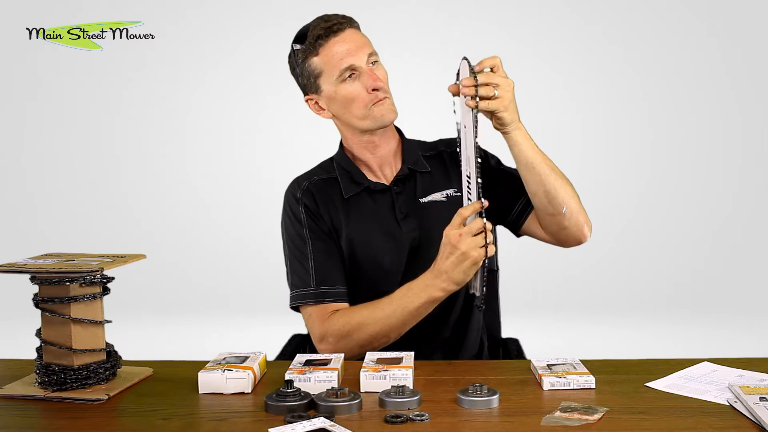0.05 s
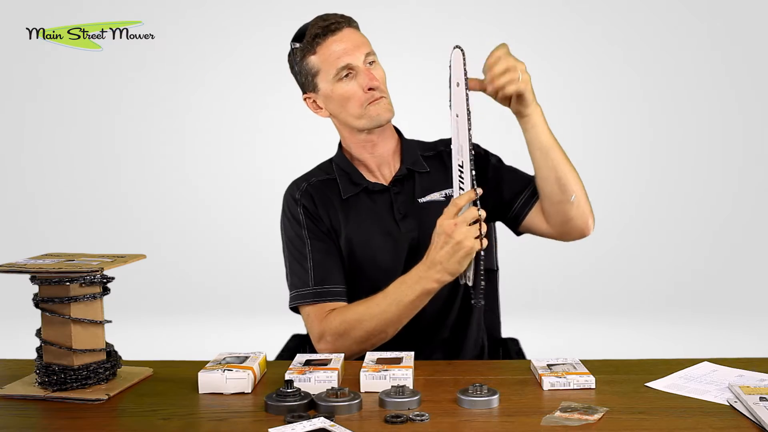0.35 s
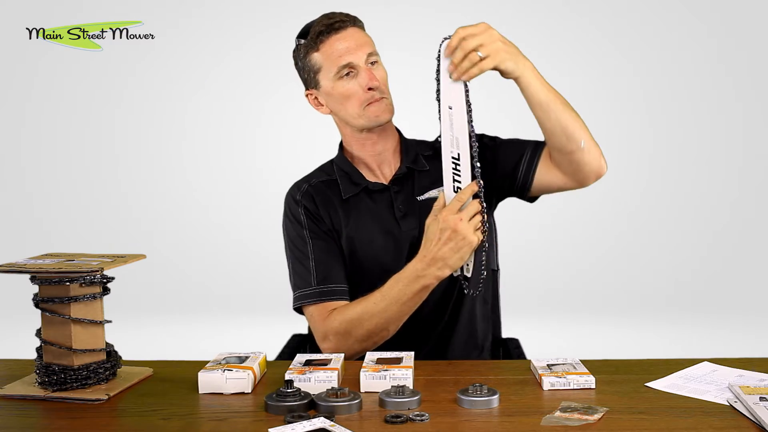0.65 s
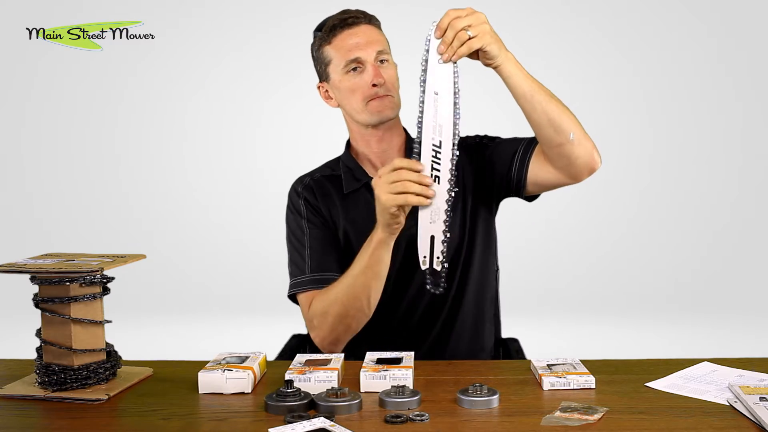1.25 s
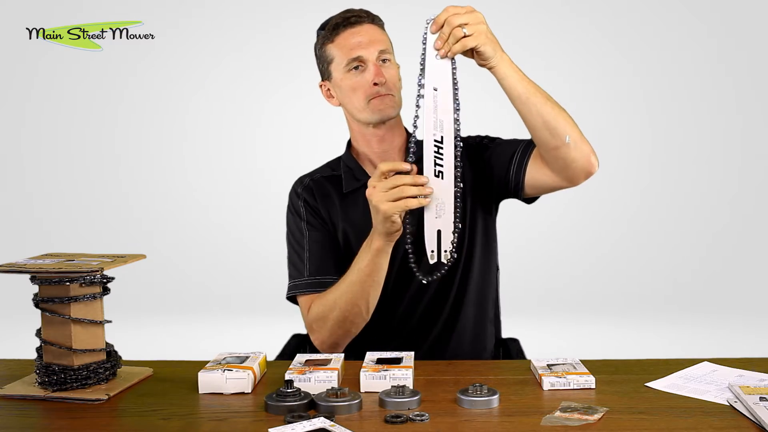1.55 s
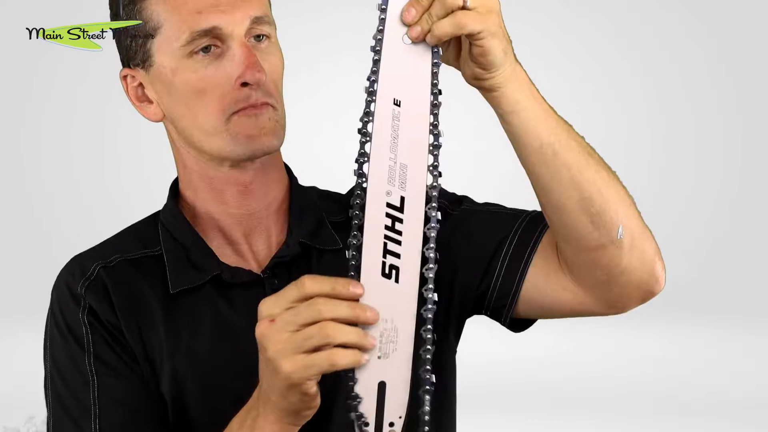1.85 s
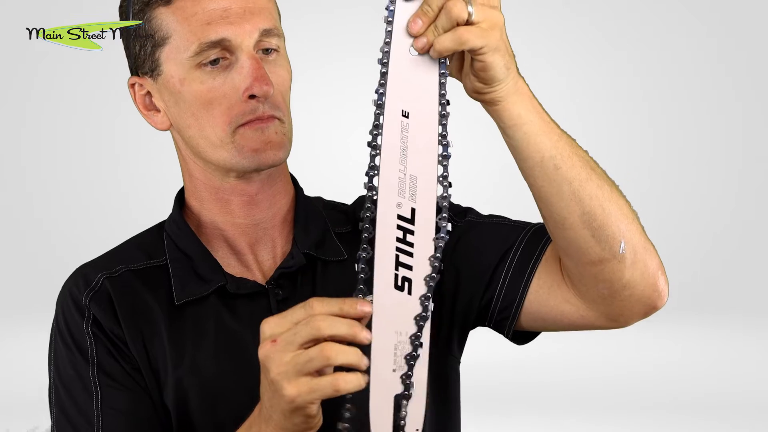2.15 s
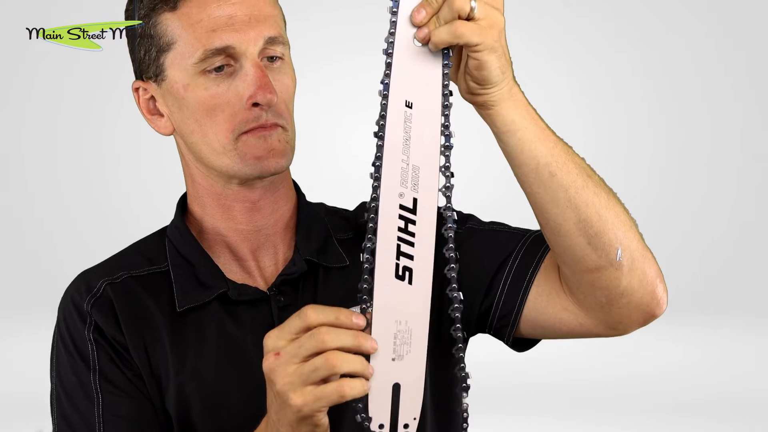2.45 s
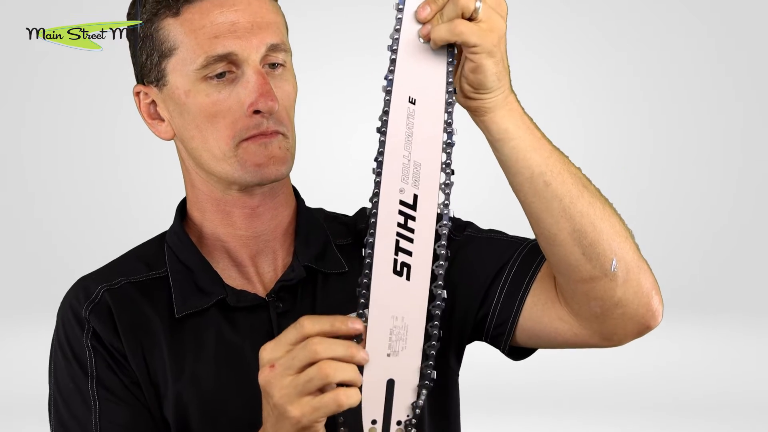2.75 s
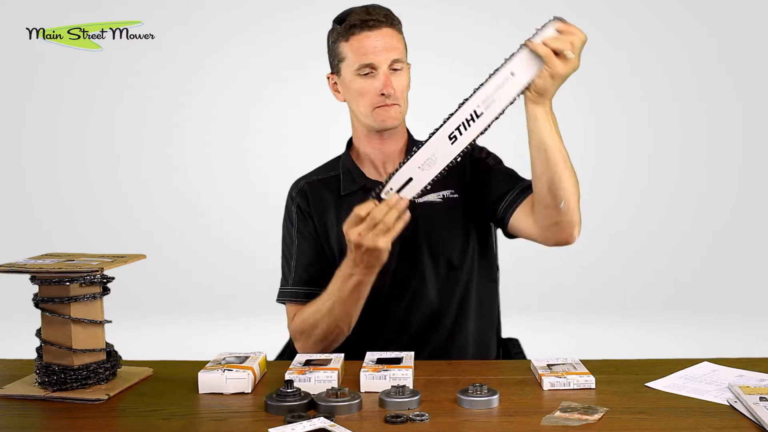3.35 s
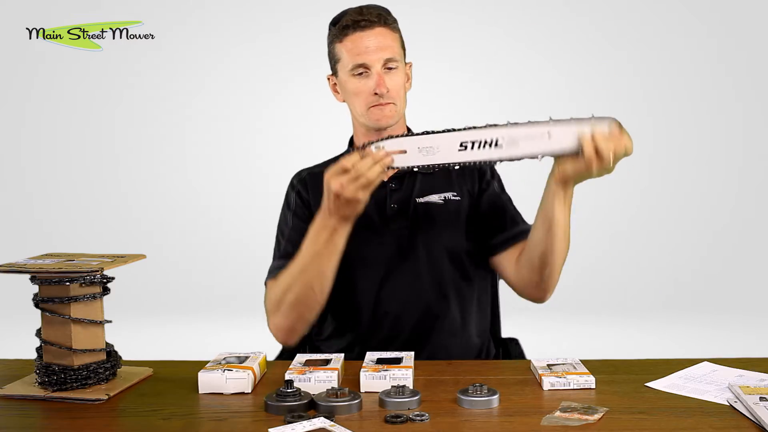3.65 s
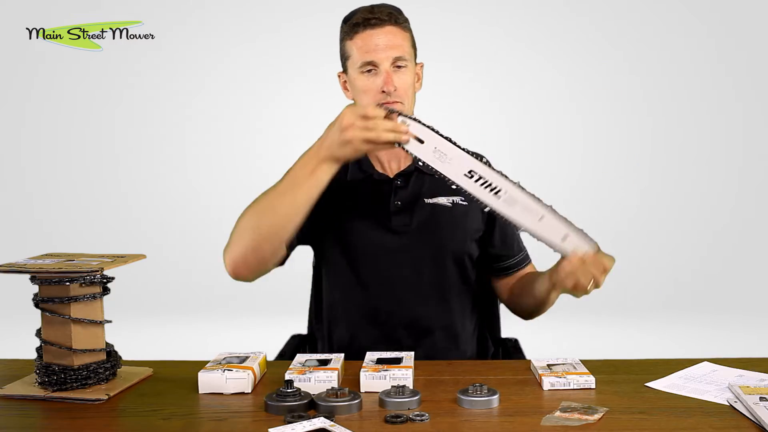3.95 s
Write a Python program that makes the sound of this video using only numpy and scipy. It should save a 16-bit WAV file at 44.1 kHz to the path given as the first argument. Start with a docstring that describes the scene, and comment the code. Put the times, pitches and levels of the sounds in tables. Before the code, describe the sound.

A loose saw chain clicks and rattles in short, irregular bursts as it is fitted round a steel guide bar. Past the middle, one small ping rings on briefly. A faint motor hum lies beneath in the quiet room.

```python
"""A loose saw chain clicks and rattles as it is fitted round a hand-held steel guide bar in a quiet room.
Links strike the bar and slip along it in short bursts, ringing modes that change with the grip;
one small steel part pings and rings on. The chain rubs softly at first, then scrapes and squeaks
as the bar is turned, with a low rustle of the arms. A faint motor drone and room noise lie underneath."""
import sys
import numpy as np
from scipy import signal
from scipy.fft import rfft, irfft
from scipy.io import wavfile

SR = 44100
rng = np.random.default_rng(int(sys.argv[2]) if len(sys.argv) > 2 else 0)


def generate_wav(signal):
    """Clip the signal to [-1, 1] and save it as 16-bit WAV at the path in sys.argv[1]."""
    frames = np.transpose(np.atleast_2d(signal))
    scaled = np.clip(frames, -1, 1) * 32767
    pcm = np.round(scaled).astype(np.int16)
    wavfile.write(sys.argv[1], SR, pcm)


N = 176400

# The three registers of a link contact: low knock, mid clack, bright edge.
# Each row: low and high limit in Hz, then a click's trim in dB and its t60 in seconds.
REGISTERS = [(1263, 2410, 1, 0.021), (3050, 8170, -5.5, 0.034), (7800, 14550, -1, 0.012)]
# Modes of bar and chain. Each row: frequency in Hz, then relative level in dB for each of four grips:
# pinched, feeding the chain on, pulling it round, letting it hang.
BAR_MODES = [(1915, -7.5, -2.5, -31, -33), (3456, -4.5, -38, -21, -11), (4150, -40, -6, -35, -29),
             (4630, -25, -3, -7, -6), (5270, -7.5, -4.5, 0, 2), (5740, 0.5, -3, -0.5, -5),
             (8430, -15, -10, -17, -30)]
GRIP_CHANGES_S = [.5, 1.15, 2.0]


def undb(db):
    """Decibels to gain."""
    return 10 ** (np.asarray(db) / 20)


def unit(x):
    """Scale to rms 1."""
    return x / np.sqrt(np.mean(x ** 2) + 1e-20)


def curve(table, column=1):
    """One column of a timed table, at every sample."""
    rows = np.array(table)
    return np.interp(np.arange(N) / SR, rows[:, 0], rows[:, column])


def fade(t, t60):
    """Full level until t = 0, then an exponential decay."""
    return np.exp(-np.log(1000) * np.maximum(t, 0) / t60)


def band(x, lo, hi, order=2):
    """Causal band-pass."""
    return signal.sosfilt(signal.butter(order, [lo, min(hi, SR * .45)], "band", fs=SR, output="sos"), x)


def band_noise(lo, hi):
    """Noise between two frequencies, at rms 1."""
    return unit(band(rng.standard_normal(N), lo, hi))


def coloured(points):
    """Noise at rms 1, its spectrum shaped by (Hz, dB) points."""
    hz, db = np.array(points).T
    freqs = np.maximum(np.fft.rfftfreq(N, 1 / SR), 1)
    gain = undb(np.interp(np.log(freqs), np.log(hz), db))
    return unit(irfft(rfft(rng.standard_normal(N)) * gain, N))


def add(out, start, x):
    """Mix x in at a time in seconds."""
    i = max(int(start * SR), 0)
    out[i:i + len(x)] += x[:max(N - i, 0)]


def room_tone():
    """A dark bed of air with the boom of a low room resonance."""
    # Room resonance. Each row: centre in Hz, width in Hz, level in dB.
    resonances = [(55.74, 5.4, -61.5)]
    # Colour of the air. Each row: frequency in Hz, relative level in dB.
    air_colour = [(12, -61), (20, -26), (53, -5.5), (93, -12.5), (134, -8), (410, -20.5), (660, -20.5),
                  (8650, -44), (16000, -47)]
    boom = sum(undb(db) * band_noise(hz - width / 2, hz + width / 2) for hz, width, db in resonances)
    return boom + undb(-56.5) * coloured(air_colour)


def motor():
    """A distant motor hums with a weak octave, drifting in pitch and wavering in level."""
    # The drone's course. Each row: time in seconds, pitch in Hz, level in dB.
    drone = [(0, 135.5, -60), (1.9, 141.8, -54.5), (2.7, 128.2, -59), (3.2, 130.8, -54.5),
             (3.55, 125, -46.5), (4, 124.7, -52.5)]
    phase = 2 * np.pi * np.cumsum(curve(drone)) / SR
    waver = undb(2 * band_noise(0.92, 6.3))
    hum = np.sin(phase) + undb(-13.5) * np.sin(2 * phase)
    return undb(curve(drone, column=2)) * waver * hum


def room_reverb(x):
    """The room adds a short, weak diffuse tail."""
    t = np.arange(SR // 2) / SR
    tail = band(rng.standard_normal(len(t)), 490, 12800) * fade(t, t60=0.17) * (t > .004)
    return x + undb(-16) * signal.fftconvolve(x, tail / np.linalg.norm(tail))[:N]


def arm_swing():
    """A low rustle swells near the end as the arms swing the bar level."""
    # The swell. Each row: time in seconds, level in dB.
    swell = [(3.1, -67.5), (3.6, -55.5), (4, -55)]
    # Colour of the rustle. Each row: frequency in Hz, relative level in dB.
    rustle_colour = [(120, -14.5), (220, 1), (450, -17.5), (4000, -36.5), (12000, -48)]
    return undb(curve(swell)) * coloured(rustle_colour)


def chatter(per_s, knock_db, edge_db, spread_db=4):
    """A steady stream of tiny random link contacts; knock and edge are set relative to the clack."""
    ticks = (rng.random(N) < per_s / SR) * rng.choice([-1, 1], N)
    strength = undb(spread_db * np.clip(rng.standard_normal(N), -2, 2))
    t = np.arange(SR // 50) / SR
    power = signal.fftconvolve((ticks * strength) ** 2, fade(t, t60=0.0042) ** 2)[:N]
    grains = np.sqrt(np.abs(power)) * rng.standard_normal(N)
    return sum(undb(db) * unit(band(grains, lo, hi, order=3))
               for (lo, hi, _, _), db in zip(REGISTERS, (knock_db, 0, edge_db)))


def rub():
    """The chain rubs softly as it is first moved, just below the bar's lowest mode."""
    t = np.arange(N) / SR
    mode_hz, end_s = BAR_MODES[0][0], 0.17
    envelope = np.clip(1 - (t / end_s) ** 2, 0, 1)
    return undb(-58) * envelope * band_noise(mode_hz * 0.84, mode_hz * 0.95)


def turning_friction():
    """Steel on steel as the bar turns: a thin squeak and a light scrape waver with the pressure."""
    # The squeak's glide. Each row: time in seconds, pitch in Hz, level in dB.
    glide = [(3.7, 13700, -78), (3.83, 15350, -71), (3.87, 14550, -73), (4, 13000, -79)]
    # The chain scraping along the bar. Each row: time in seconds, level in dB.
    scrape_rise = [(3.66, -75), (4, -72)]
    t = np.arange(N) / SR
    pressure = band_noise(10, 45)
    pitch = curve(glide) * (1 + .004 * pressure)
    squeak = undb(curve(glide, column=2) + 3 * pressure) * np.sin(2 * np.pi * np.cumsum(pitch) / SR)
    grit = chatter(per_s=900, knock_db=0, edge_db=0)
    scrape = undb(curve(scrape_rise) + 2 * pressure) * unit(band(grit, 4000, 11400))
    return squeak * (t > glide[0][0]) + scrape * (t > scrape_rise[0][0])


def jostle():
    """The slack links keep jostling lightly against each other."""
    # Movement of the slack. Each row: time in seconds, gain in dB.
    movement = [(0, -69.5), (1.4, -72), (1.95, -78), (4, -74)]
    return undb(curve(movement)) * chatter(per_s=700, knock_db=2, edge_db=-8, spread_db=3)


def slides():
    """Links slip over the bar's edge in short, dense rattles that ring its modes."""
    # Each row: start in seconds, hold in seconds, level in dB, edge relative to the clack in dB.
    slips = [(0.413, 0.057, -48, 1.5), (1.326, 0.11, -58, -4), (1.767, 0.027, -64, -12),
             (2.791, 0.0091, -50, -12), (2.8005, 0.0083, -41.5, 7.5)]
    out, t = np.zeros(N), np.arange(N) / SR
    for start, hold, db, edge_db in slips:
        envelope = (t >= start) * fade(t - start - hold, t60=1.95 * hold)
        rasp = chatter(per_s=1300, knock_db=-14, edge_db=edge_db)
        grip = np.searchsorted(GRIP_CHANGES_S, start)
        ring = sum(undb(levels[grip]) * unit(band(rasp, hz * .97, hz * 1.03))
                   for hz, *levels in BAR_MODES)
        out += undb(db) * envelope * (rasp + undb(-12) * unit(ring))
    return out


def pings():
    """A small struck steel part rings until the chain or a finger damps it; softer strikes are duller."""
    # Each row: start in seconds, level in dB, seconds of free ringing before the damping.
    strikes = [(0.6395, -51, 0.0052), (1.496, -61, 0.034), (2.265, -48, 0.028), (2.4146, -40.5, 0.343),
               (2.81, -52.5, 0.31), (3.3842, -56, 0.01)]
    # The part's modes. Each row: frequency in Hz, relative level in dB, t60 in seconds.
    modes = [(3759, 0, 0.98), (5220, -8, 0.14), (16000, -8, 0.2)]
    out, t = np.zeros(N), np.arange(SR) / SR
    tone, *overtones = [undb(db) * fade(t, t60) * np.sin(2 * np.pi * hz * t) for hz, db, t60 in modes]
    hardest_db = max(db for _, db, _ in strikes)
    for start, db, free_s in strikes:
        brightness = undb((db - hardest_db) / 2)
        ring = tone + brightness * sum(overtones)
        add(out, start, undb(db) * ring * fade(t - free_s, t60=0.11))
    return out


def crack(t, lo, hi, t60):
    """A contact rings many crowded modes of the links for a few milliseconds."""
    contact_s = 0.00071
    envelope = fade(t - contact_s, t60)
    burst = band(rng.standard_normal(len(t)) * envelope, lo, hi, order=3)
    return unit(burst) * np.sqrt(np.mean(envelope ** 2))


def link_clicks():
    """A link hits the bar: a crack, a neighbour's tick, its own clink and the bar's modes for that grip."""
    # Each row: start in seconds, level in dB, extra gain of the edge register in dB.
    strikes = [(0.051, -44, 2), (0.064, -40, 4), (0.094, -45, 3.5), (0.247, -44, -1.5), (0.2836, -44, 0.5),
               (0.291, -47.5, -6), (0.343, -49, 8.5), (0.4205, -37, 5.0), (0.4268, -47.5, 15.5),
               (0.4352, -41, 9), (0.4428, -37, 3.0), (0.4595, -31.5, -3.0), (0.4621, -35.5, 5.5),
               (0.623, -39, -1), (0.6605, -47, 4), (0.703, -39.5, -3), (0.852, -45, 3.5), (0.875, -41.5, 6),
               (0.884, -56, 3.0), (0.9441, -47, 0.5), (1.008, -37.5, -2), (1.102, -44.5, 0.5),
               (1.21, -38, -9), (1.2486, -39.5, 1), (1.337, -42, 5.5), (1.3619, -34.5, -9.0),
               (1.372, -39, -9.0), (1.385, -44, 0), (1.394, -40, 2.5), (1.636, -46.5, 1.5),
               (1.6747, -44.5, 5.0), (1.762, -50.5, 3.0), (1.77, -49.0, 8.5), (1.7832, -46, 2),
               (1.8, -44.5, -8), (1.823, -42.5, 1.5), (2.2253, -43.5, -2), (2.2593, -36.0, -24.0),
               (2.2645, -43.5, 2), (2.4129, -36, 7.5), (2.42, -39, 5.5), (2.637, -46.5, -8),
               (2.674, -44, -2.0), (2.719, -50, 12), (2.804, -40.5, -3), (2.8091, -38.5, 13.5),
               (3.0421, -45, 9), (3.3835, -38.5, 7), (.171, -48.5, -4), (.22, -49, 1), (.817, -50, -12),
               (1.496, -48.5, 1.5), (2.572, -53, -3), (3.064, -50, -2), (3.116, -55, 1.5),
               (3.221, -54.5, 0), (3.318, -53.5, -7)]
    # Extra gain of the knock register in dB, for each of the four grips.
    knock_db = [-9, -16, -12, -12.5]
    clink_range_hz, clink_db = (5500, 9000), -5
    neighbour_lag_s, neighbour_db = .018, -13
    ring_db, scatter_db, detune = -2, 3, .008
    out, t = np.zeros(N), np.arange(SR // 5) / SR
    for start, db, edge_db in strikes:
        grip = np.searchsorted(GRIP_CHANGES_S, start)
        balance = (knock_db[grip], 0, edge_db)
        hit = sum(undb(trim_db + extra_db) * crack(t, lo, hi, t60)
                  for (lo, hi, trim_db, t60), extra_db in zip(REGISTERS, balance))
        add(out, start + neighbour_lag_s * rng.random(), undb(db + neighbour_db) * hit)
        modes = [(hz, levels[grip]) for hz, *levels in BAR_MODES]
        clink = (rng.uniform(*clink_range_hz), clink_db)
        for hz, mode_db in modes + [clink]:
            strength, mistune, phase = rng.standard_normal(3)
            gain = undb(ring_db + mode_db + scatter_db * strength)
            pitch = hz * (1 + detune * mistune)
            hit += gain * fade(t, t60=0.026) * np.sin(2 * np.pi * (pitch * t + phase))
        add(out, start, undb(db) * hit)
    return out


def scene():
    """Chain and bar in the room, over the motor, the room tone and the rustle of the arms."""
    steel = link_clicks() + jostle() + slides() + pings() + rub() + turning_friction()
    return (room_reverb(steel) + motor() + room_tone() + arm_swing())[None]


def record(dry):
    """A steep low-pass cuts the very top."""
    top_hz = 15900
    return signal.sosfilt(signal.ellip(10, .2, 70, top_hz, fs=SR, output="sos"), dry)


dry = scene()
out = record(dry)
generate_wav(out)
```